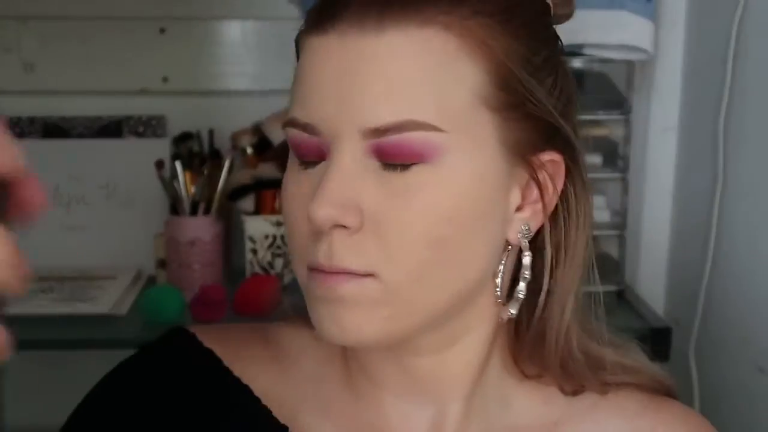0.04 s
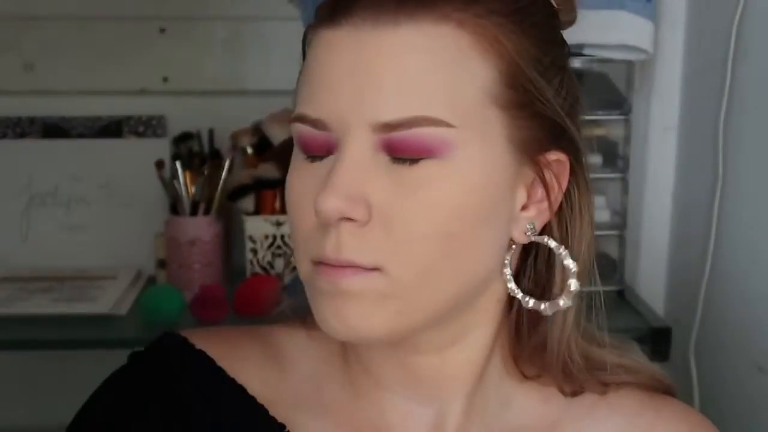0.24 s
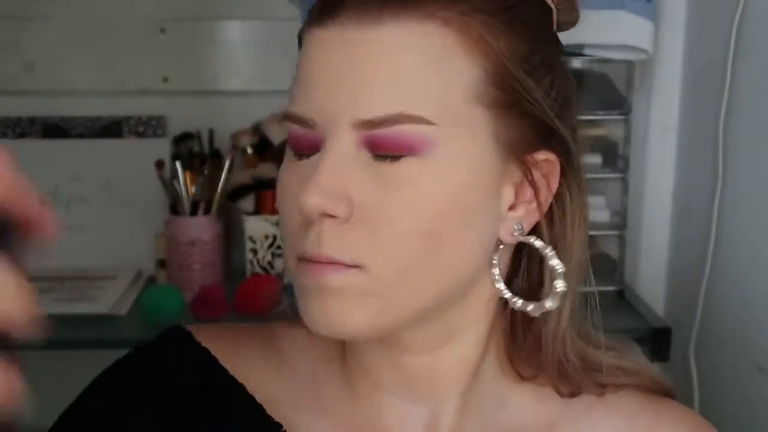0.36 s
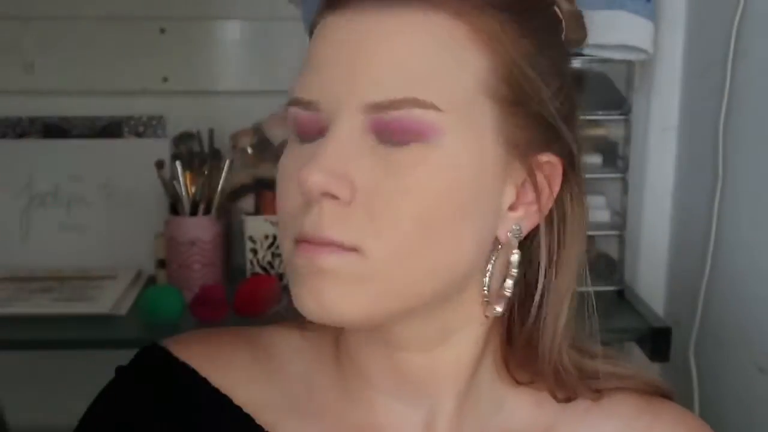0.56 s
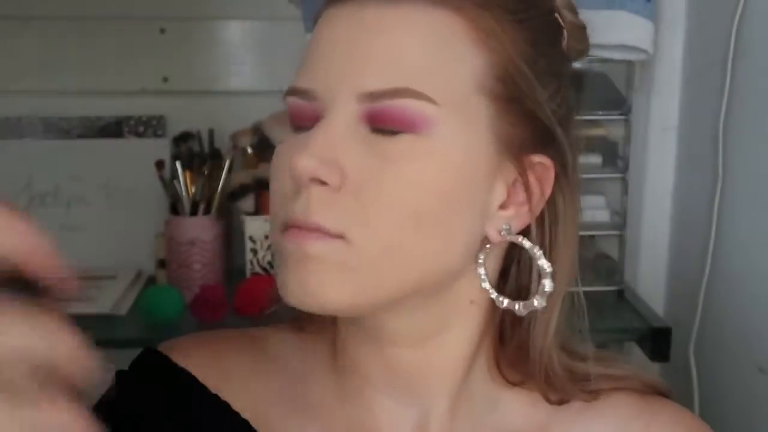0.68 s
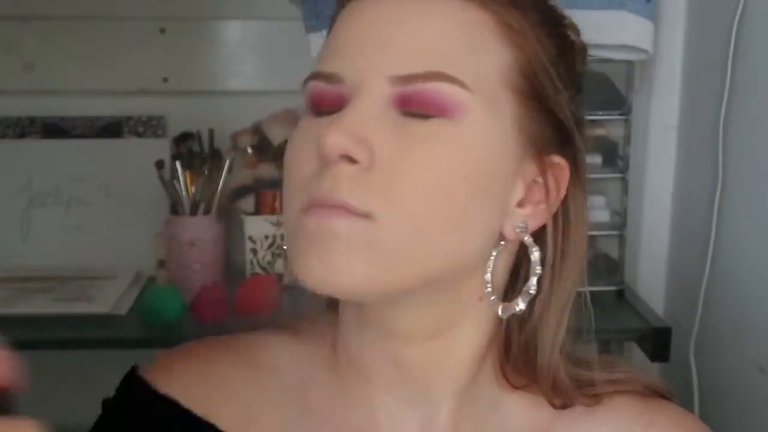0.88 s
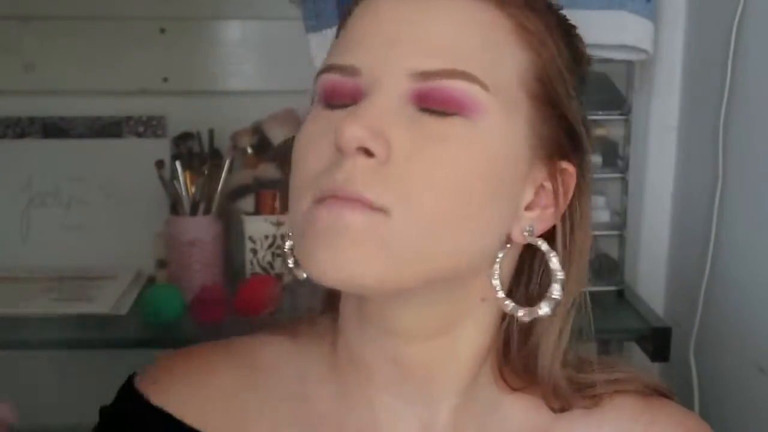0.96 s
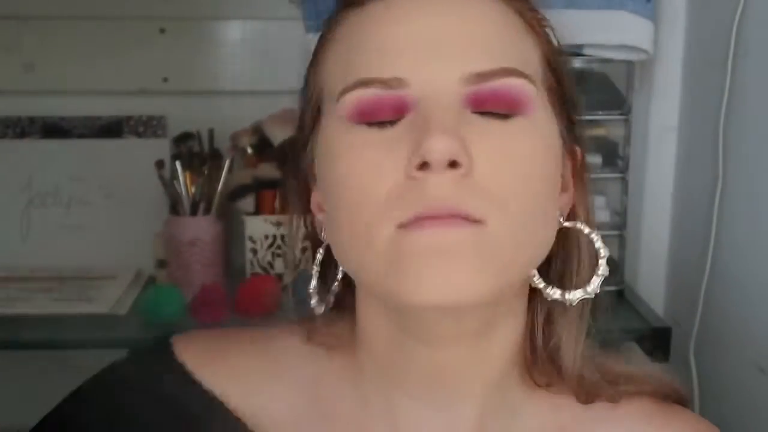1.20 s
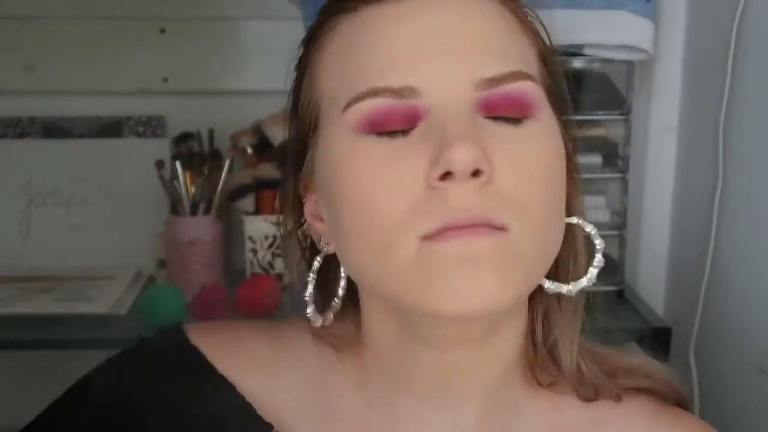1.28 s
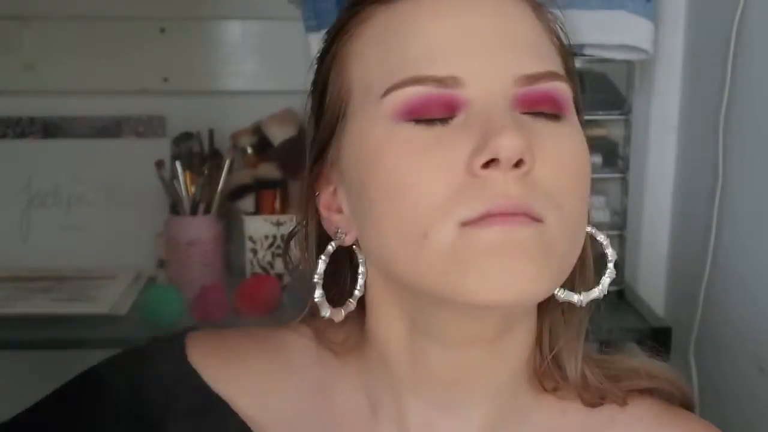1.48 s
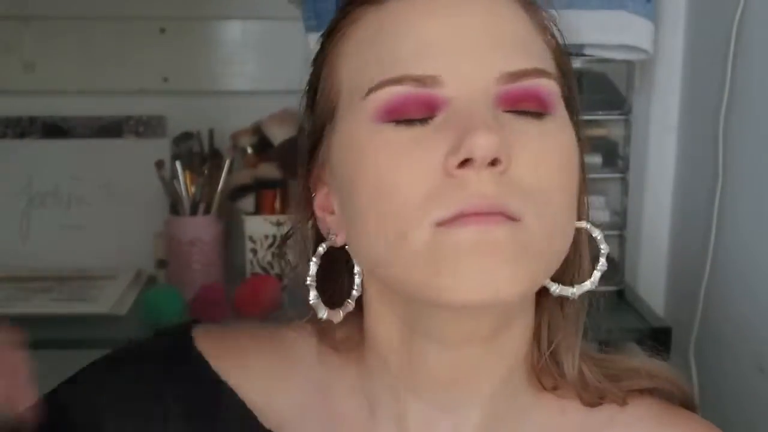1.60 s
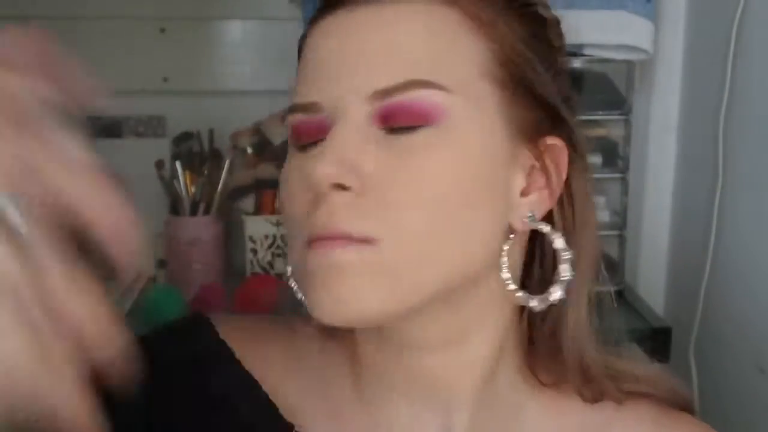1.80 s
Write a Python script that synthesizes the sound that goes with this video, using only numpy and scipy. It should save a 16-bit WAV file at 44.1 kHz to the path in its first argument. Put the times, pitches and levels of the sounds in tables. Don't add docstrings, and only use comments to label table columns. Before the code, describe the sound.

Spray bottle valve clicks once close up, followed by a continuous airy mist hiss.

```python
import sys
import numpy as np
from scipy import signal
from scipy.fft import rfft, irfft, next_fast_len
from scipy.io import wavfile
from scipy.ndimage import uniform_filter1d, map_coordinates

SR = 44100
rng = np.random.default_rng(int(sys.argv[2]) if len(sys.argv) > 2 else 0)


def ratio_of_db(decibels):
    return 10 ** (np.asarray(decibels, float) / 20)


def unload_audio(sound):
    columns = np.transpose(np.atleast_2d(sound))
    steps = np.round(np.clip(columns, -1, 1) * 32767)
    wavfile.write(sys.argv[1], SR, steps.astype(np.int16))


N = 81585
SNAP_S = 0.20126


def unit(x):
    return x / np.sqrt(np.mean(x ** 2) + 1e-20)


def along(points, hz):
    f, v = np.transpose(points)
    return np.interp(np.log(hz + 1), np.log(f + 1), v)


def wobble(rate):
    knots = rng.standard_normal(int(N * rate / SR) + 4)
    return map_coordinates(knots, [np.arange(N) * rate / SR])


def filtered(x, response):
    m = next_fast_len(N + SR // 2)
    return irfft(rfft(x, m) * response(np.fft.rfftfreq(m, 1 / SR)), m)[..., :N]


def bump(hz, centre_hz, width_hz):
    return 1j * hz * width_hz / (centre_hz ** 2 - hz ** 2 + 1j * hz * width_hz)


def lead(x, s):
    return filtered(x, lambda hz: np.exp(1j * np.pi * hz * s * np.array([[1], [-1]])))


def likeness_angle(likeness):
    return np.arccos(np.clip(likeness, -1, 1)) / 2


def rush(gain, alike, patchy_db):
    z = signal.stft(rng.standard_normal((2, N + 512)), nperseg=512)[2]
    patches = uniform_filter1d(rng.standard_normal(z.shape[1:]), 6, 0)
    patches = uniform_filter1d(patches, 10, 1)
    pair = signal.istft(z * ratio_of_db(patchy_db * unit(patches)), nperseg=512)[1][:, :N]

    def mid_side(hz):
        angle = likeness_angle(along(alike, hz))
        return gain(hz) * [np.cos(angle), np.sin(angle)]

    mid, side = filtered(pair, mid_side)
    return unit(np.array([mid + side, mid - side]))


# frequency in Hz, level in dB per Hz.
RUMBLE = [(15, -65), (28, -2.5), (40, -5.5), (60, -11), (100, -16), (200, -19.5), (500, -17), (900, -64)]
# centre in Hz, width in Hz, level in dB.
DUCT = [(295.5, 69, -0.5), (392, 73, -8), (421, 17, -27.5), (671, 84, -11), (940, 31, -14)]
# time in seconds, level in dB.
DRAUGHT = [(0.0, -48.5), (0.216, -47), (0.256, -48.5), (0.462, -45), (1.138, -45), (1.324, -42),
           (1.582, -46.5), (1.85, -47)]
# frequency in Hz, level in dB per Hz.
AIR = [(290, -47), (500, -13.5), (953, -1.5), (1220, -9.5), (1310, -8.5), (1590, -9.5), (2120, -13.5),
       (6000, -33), (7800, -79), (13200, -120)]
# frequency in Hz, left-right likeness from -1 to 1.
AIR_ALIKE = [(50, 1), (100, 1), (180, 0.87), (300, 0.98), (640, 0.88), (1400, 0.88), (4400, 0.42),
             (15000, -0.012)]


def ventilation():
    t = np.arange(N) / SR
    hum_hz, hum_db, rumble_db, air_db = 40, -50, -45, -49
    hum = np.sin(2 * np.pi * hum_hz * t + 1.15 * wobble(5.17))
    hum *= ratio_of_db(hum_db + 3.0 * wobble(5.8))
    rumble = rush(lambda hz: ratio_of_db(along(RUMBLE, hz)), AIR_ALIKE, patchy_db=0.4)

    def duct_gain(hz):
        return sum(ratio_of_db(db) * np.abs(bump(hz, centre, width)) ** 2 for centre, width, db in DUCT)

    duct = rush(duct_gain, AIR_ALIKE, patchy_db=1.1)
    draught = ratio_of_db(np.interp(t, *np.transpose(DRAUGHT)))
    air = rush(lambda hz: ratio_of_db(along(AIR, hz)) * (hz > 300), AIR_ALIKE, patchy_db=1.7)
    return hum + ratio_of_db(rumble_db) * rumble + draught * duct + ratio_of_db(air_db) * air


# start in seconds, level in dB, pitch in Hz.
TICKS = [
    (.106, -42, 4100),
    (.145, -46, 3800),
    (.186, -51, 3800),
]


def finger_ticks():
    t = np.arange(N) / SR
    t60_s, rise_s, width_hz = 0.012, 0.00045, 1500
    out = np.zeros(N)
    for start, db, pitch_hz in TICKS:
        u = np.clip(t - start, 0, None)
        puff = unit(filtered(rng.standard_normal(N), lambda hz: bump(hz, pitch_hz, width_hz) ** 2))
        out += ratio_of_db(db - 60 * u / t60_s) * puff * (1 - np.exp(-u / rise_s))
    return out


# time in seconds, flow in dB, cap pitch in Hz, cap aim in dB.
JET = [(0.27, -46.5, 2960, 7.5), (0.352, -46.5, 2990, 3), (0.604, -48, 2901, 11.5), (0.66, -49, 2842, 4.5),
       (0.78, -48.5, 2837, 8), (1.096, -50.5, 2990, 4.5), (1.11, -51, 2957, 10.5), (1.238, -51, 2960, 10),
       (1.326, -46.5, 2821, 2), (1.374, -50, 2821, 9.5), (1.458, -48, 2811, 4), (1.496, -48.5, 2987, 5.5),
       (1.554, -52, 2811, 12.5), (1.568, -51, 2810, 6), (1.712, -49.5, 2838, 10.5), (1.73, -48, 2850, 0.5),
       (1.796, -47, 2840, 7.5), (1.85, -48.5, 3040, 1.5)]
# frequency in Hz, level in dB per Hz.
FIZZ = [(700, -66), (1400, -13.5), (2200, -4.5), (3600, 2), (5500, -2.5), (8500, -3.5), (12000, -2),
        (15700, -11.5)]
# frequency in Hz, left-right likeness from -1 to 1.
JET_ALIKE = [(1500, 0.99), (2300, 1), (3300, 0.97), (4400, 0.28), (7500, 0.047), (11500, -0.74),
             (12800, -0.48), (15000, -0.55)]


def jet():
    t = np.arange(N) / SR
    open_s, open_rise_s = 0.1934, 0.0046
    s, *columns = np.transpose(JET)
    flow_db, cap_hz, aim_db = [np.interp(t, s, column) for column in columns]
    fizz = rush(lambda hz: ratio_of_db(along(FIZZ, hz)), JET_ALIKE, patchy_db=2.64)
    fizz *= ratio_of_db(8.0 + 0.14 * wobble(8.8))

    centre = cap_hz.mean()
    cap_width_hz, skirt_width_hz, skirt_db, cap_db = 560, 1620, -12.5, 7

    def cap_gain(hz):
        peak = np.abs(bump(hz, centre, cap_width_hz)) ** 3
        skirt = np.abs(bump(hz, 1.033 * centre, skirt_width_hz)) ** 3
        return peak + ratio_of_db(skirt_db) * skirt

    cap = rush(cap_gain, [(3000, 0.99)], patchy_db=1.66)
    slide = np.exp(2j * np.pi * 0.47 * np.cumsum(cap_hz - centre) / SR)
    cap = np.real(signal.hilbert(cap, next_fast_len(N))[:, :N] * slide)
    cap *= ratio_of_db(cap_db + aim_db - aim_db.mean() + 0.17 * wobble(29.5))
    opening = np.clip((t - open_s) / open_rise_s, 0, 1)
    return opening * ratio_of_db(flow_db) * (fizz + lead(cap, 0.00002))


# frequency in Hz, level in dB, t60 in seconds.
SNAP_MODES = [(2870, 0, .0041), (2300, -17, .005), (3500, -15, .004), (4600, -17, .003), (8700, -28, .003),
              (930, -46, .05)]
# time in seconds, level in dB relative to the snap.
ECHOES = [
    (.1993, -29),
    (.2056, -24),
    (.2092, -28),
    (.2114, -23),
    (.2142, -28),
]


def valve_snap():
    t = np.arange(N) / SR
    snap_db, rise_s, crack_db, crack_t60_s = 18.5, 0.00045, -21, 0.002
    out = np.zeros(N)
    for start, db in [(SNAP_S, 0)] + ECHOES:
        u = np.clip(t - start, 0, None)
        ring = sum(ratio_of_db(level - 60 * u / t60) * np.sin(2 * np.pi * hz * u) for hz, level, t60 in SNAP_MODES)
        crack = ratio_of_db(crack_db - 60 * u / crack_t60_s) * np.gradient(rng.standard_normal(N))
        out += ratio_of_db(snap_db + db) * (ring + crack) * (1 - np.exp(-u / rise_s)) ** 2
    return out


# frequency in Hz, level in dB.
ROOM_COLOUR = [(400, -29), (900, -13.5), (1500, -11.5), (2300, -8.5), (2800, 4), (3400, -7), (4500, -24),
               (12000, -32)]
# frequency in Hz, t60 in seconds.
ROOM = [(300, 0.15), (1000, 0.25), (2500, 0.18), (5000, 0.059), (12000, 0.025)]


def room():
    room_db, alike, gap_s, rise_s = -1.5, 0.93, 0.003, 0.004
    hz, t, z = signal.stft(rng.standard_normal((2, SR // 2)), SR, nperseg=256)
    decay_db = along(ROOM_COLOUR, hz)[:, None] - 60 * t / along(ROOM, hz)[:, None]
    a, b = signal.istft(z * ratio_of_db(decay_db), SR, nperseg=256)[1]
    angle = likeness_angle(alike)
    mid, side = np.cos(angle) * a, np.sin(angle) * b
    tail = np.array([mid + side, mid - side]) * ratio_of_db(room_db)
    tail *= np.clip(np.arange(len(a)) / (rise_s * SR), 0, 1)
    start = round((SNAP_S + gap_s) * SR)
    return np.pad(tail, ((0, 0), (start, N)))[:, :N]


def scene():
    low_hz = 1210 / 3
    button = filtered(finger_ticks() + valve_snap(), lambda hz: 1j * hz / (low_hz + 1j * hz))
    button = lead(button, 0.00003) * ratio_of_db([[0.6], [-0.6]])
    return ventilation() + button + jet() * ratio_of_db([[0.3], [-0.3]]) + room()


# frequency in Hz, level in dB per Hz.
SELF_HISS = [(2000, -12), (4000, 0), (8000, -4), (12000, -9), (15500, -22)]


def self_hiss():
    return ratio_of_db(-66) * rush(lambda hz: ratio_of_db(along(SELF_HISS, hz)), [(5000, -0.074)], patchy_db=1.5)


def top_cut(x):
    return signal.sosfilt(signal.butter(12, 16400, fs=SR, output="sos"), x)


def record(dry):
    u = np.arange(N) / SR - SNAP_S
    duck_db, recover_s = -4.5, 0.24
    x = dry + self_hiss()
    x = x * ratio_of_db(duck_db * np.exp(-np.abs(u) / recover_s) * (u > 0.004))
    top, knee = 1.06, 8
    x = x / (1 + np.abs(x / top) ** knee) ** (1 / knee)
    mix = filtered(x, lambda hz: hz < 15800)
    return top_cut(mix)


dry = scene()
out = record(dry)
unload_audio(out)
```